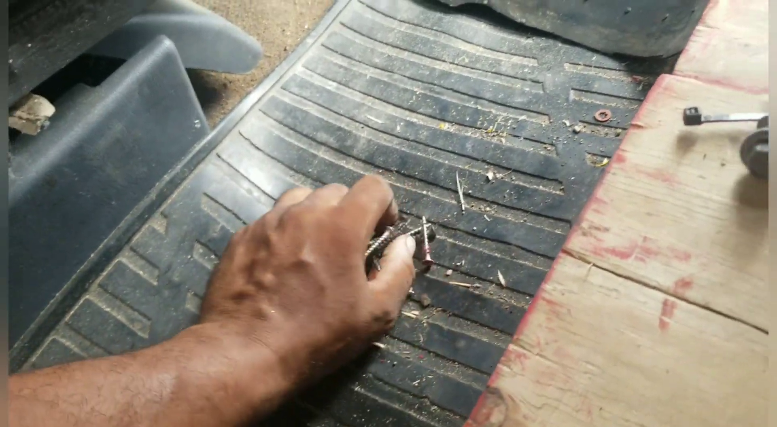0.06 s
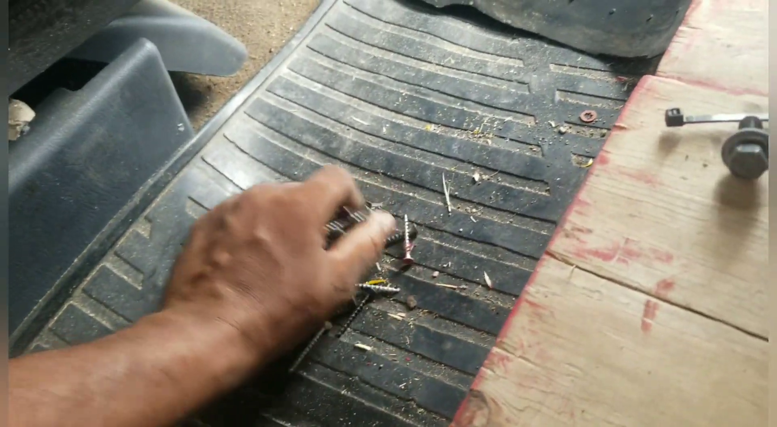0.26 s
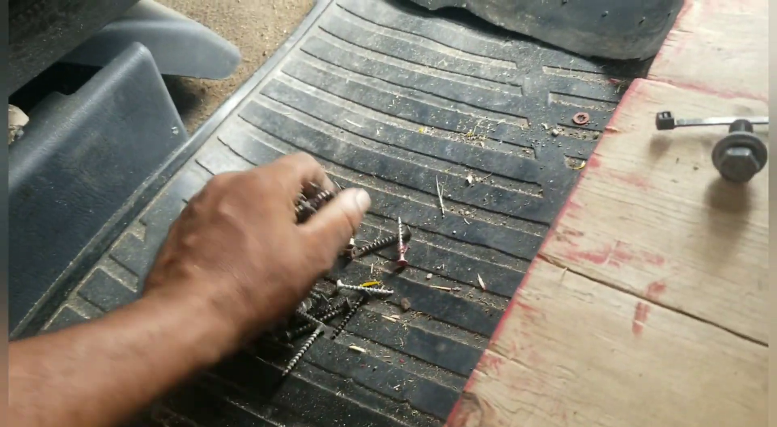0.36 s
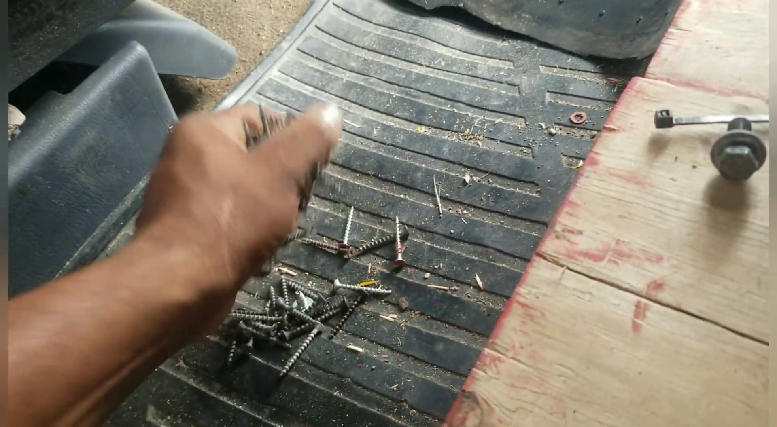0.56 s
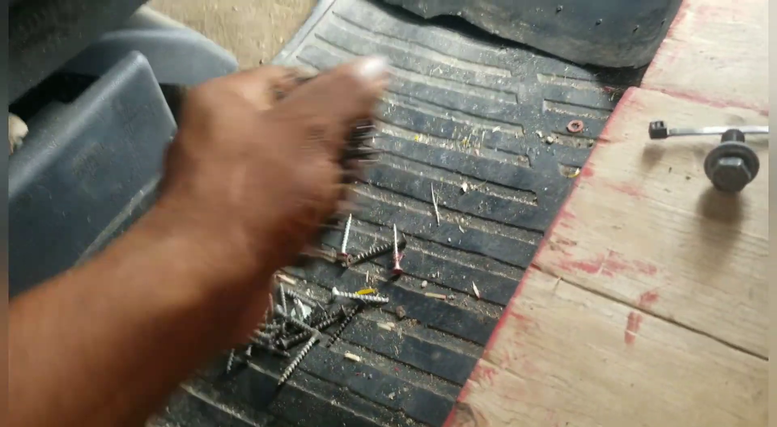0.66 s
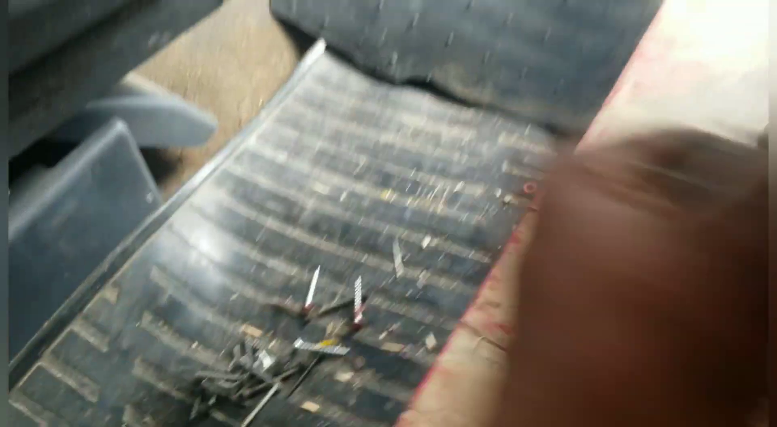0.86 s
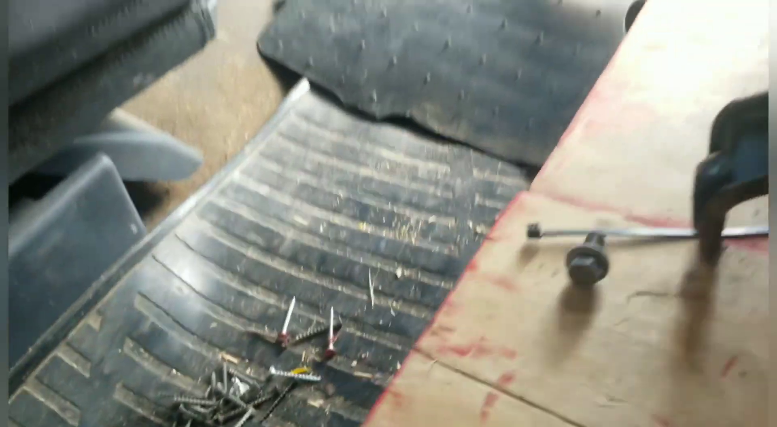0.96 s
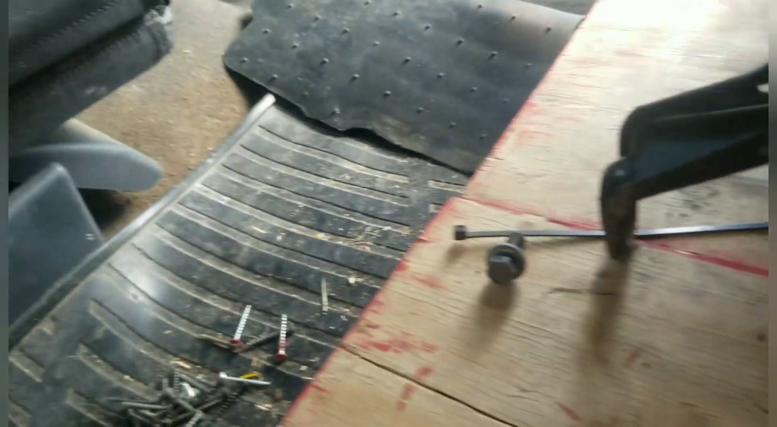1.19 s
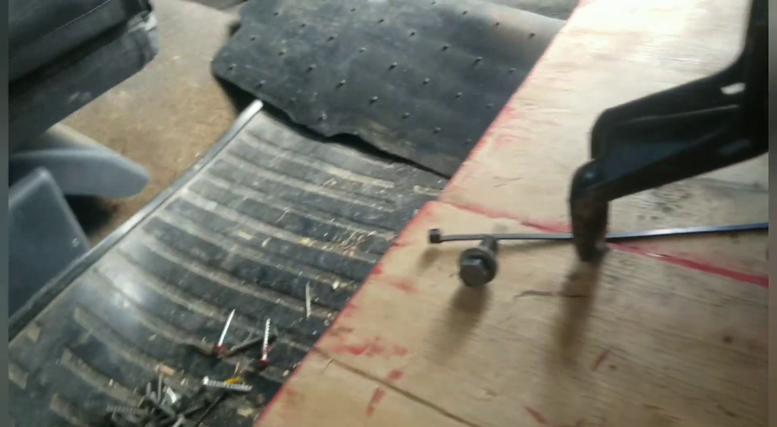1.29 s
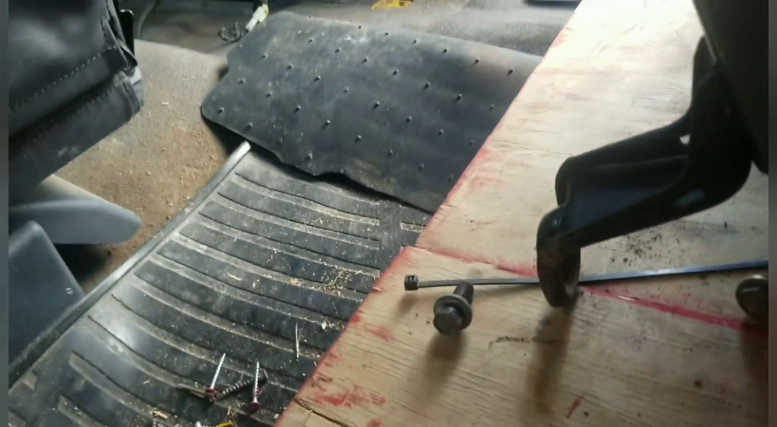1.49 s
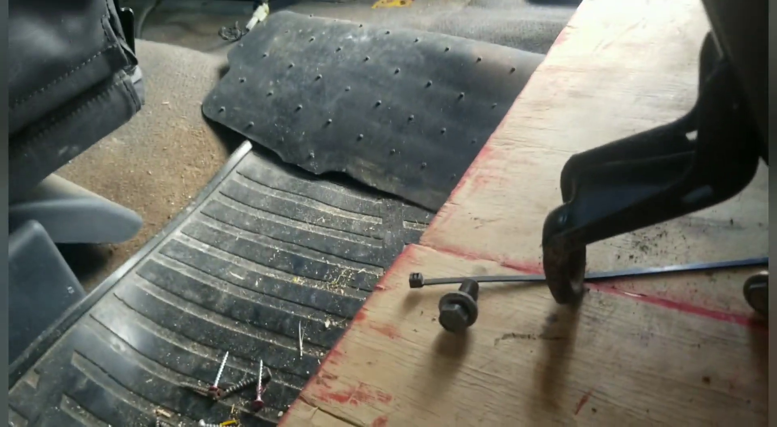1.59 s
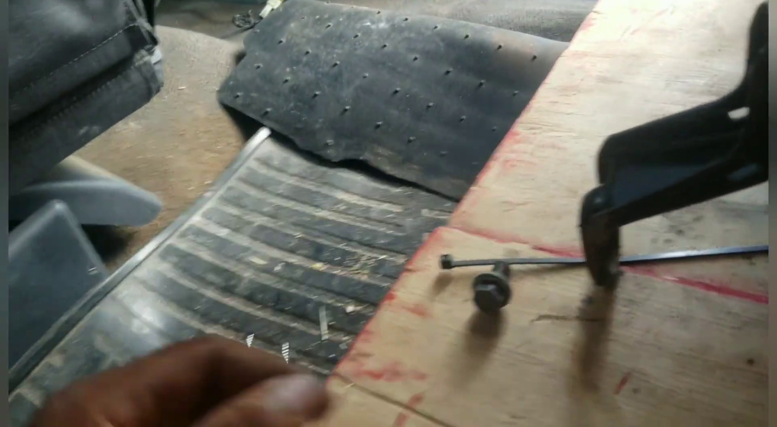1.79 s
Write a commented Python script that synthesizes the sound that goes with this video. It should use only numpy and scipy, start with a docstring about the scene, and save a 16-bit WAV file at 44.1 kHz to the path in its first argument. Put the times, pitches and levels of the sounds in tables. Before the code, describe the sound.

Loose metal screws clink as a hand gathers them, then metal clatters on a vehicle floor.

```python
"""Loose screws on a car floor

A hand rakes steel screws together on a rubber mat. A bunch clinks down brightly and bounces, setting
other screws and nearby sheet metal ringing. A second later a duller clatter thumps the floor.
The small cabin smears each hit into a short tail; soft rubbing and handling rumble lie underneath."""
import sys
import numpy as np
from scipy import signal
from scipy.fft import rfft, irfft, next_fast_len
from scipy.io import wavfile

SR = 44100
rng = np.random.default_rng(int(sys.argv[2]) if len(sys.argv) > 2 else 0)


def inscribe(sig):
    """Save sig as 16-bit PCM at rate SR to the path in sys.argv[1].

    A 1-D sig is mono; a 2-D sig holds one channel per row.
    Samples are clipped to [-1, 1] before scaling.
    """
    pcm = np.round(np.clip(np.atleast_2d(sig).T, -1, 1) * 32767)
    wavfile.write(sys.argv[1], SR, pcm.astype(np.int16))


N = 81585
RING_TIME = np.arange(int(.7 * SR)) / SR   # seconds since a hit

# A "colour" says how strong each pitch is in a noise. A "mode" is one tone a struck object rings at.
# "t60" is the time a sound takes to fade by 60 dB.

# how loud the hand's rubbing and the handling rumble are over time: t/s, level/dB
RUB_LEVEL = [(0, -52), (.22, -53), (.42, -52.5), (.55, -73), (.7, -65), (.8, -79.5), (1.26, -74),
             (1.58, -51), (1.72, -60.5), (1.85, -61)]
RUMBLE_LEVEL = [(0, -55.5), (.3, -58.5), (.5, -56.5), (.58, -47.5), (.66, -45.5), (.77, -55), (.87, -49),
                (.97, -47.5), (1.08, -59.5), (1.28, -60), (1.68, -53.5), (1.85, -63)]
# colours of the rubbing, the rumble and the quiet cabin: f/Hz, level/dB
RUB_COLOUR = [(150, -11), (300, -1), (480, -0.5), (700, -0.5), (1100, -7.5), (2000, -16.5), (5000, -40)]
RUMBLE_COLOUR = [(60, -20.5), (110, -16.5), (140, -2), (185, -0.5), (250, -11.5), (340, -17.5), (700, -40),
                 (1500, -57.5)]
CABIN_COLOUR = [(25, -10), (50, 4), (90, -5.5), (250, -18), (600, -23), (1200, -41), (3000, -40),
                (8000, -46), (15000, -41)]

# how hard the screws are stirred: t/s, level/dB
STIR_LEVEL = [(0, -61.5), (.23, -69.5), (.3, -60), (.55, -69), (.58, -59.5), (.65, -62), (.75, -72),
              (.88, -71.5), (.97, -82.5), (1.26, -84), (1.55, -64.5), (1.72, -93), (1.85, -82.5)]
# colour of the stirring ticks: f/Hz, level/dB
STIR_COLOUR = [(500, 8), (1200, -5), (2500, 0), (3800, -10), (5500, 9.5), (8000, -19.5), (15000, -13.5)]
# how long a tick takes to fade: f/Hz, t60/s
STIR_FADE = [(1000, 0.12), (10000, 0.11)]

# bright hits of screw on screw: t/s, level/dB
CLINKS = [(.001, -57), (0.059, -55), (0.074, -53), (0.147, -52), (0.171, -53.5), (0.216, -55.5),
          (0.2427, -29), (0.245, -20), (0.2555, -27.5), (.354, -37), (0.3574, -32.5), (0.3633, -35.5),
          (0.475, -48), (.632, -69)]
# colour of a clink: f/Hz, level/dB
CLINK_COLOUR = [(80, -25.5), (200, -25), (400, -3.5), (800, -1), (1400, -0.5), (2700, -2), (3400, -10.5),
                (3950, -3.5), (5800, 1), (7600, -12.5), (9500, -4.5), (11500, -0.5), (13800, 1.5),
                (15500, -0.5)]
# how long a clink takes to fade: f/Hz, t60/s
CLINK_FADE = [(400, 0.36), (1500, 0.16), (5000, 0.3), (13000, 0.21)]
# modes of the screws and of the nearby sheet metal: f/Hz, level/dB, t60/s
SCREW_MODES = [(746.4, -0.5, 0.18), (1038, 4, 0.049), (2448, -7, 0.22)]
SHEET_MODES = [(1001, 3.5, 0.8), (1034, -6, 0.69), (1130, -3.5, .3)]
# single screws ringing out, each at its own pitch: t/s, f/Hz, level/dB
PINGS = [(.245, 2750, -41), (.245, 3790, -35), (.245, 4850, -32), (.245, 6620, -40), (.245, 11560, -33),
         (.245, 13850, -38), (.2555, 3880, -39), (.2555, 10270, -39), (.2555, 11020, -36),
         (.2555, 12810, -38), (.2555, 15070, -41), (.357, 3960, -45), (.357, 4770, -43), (.357, 11150, -44),
         (.357, 12130, -42), (.357, 13710, -38)]

# duller knocks of metal on the floor: t/s, metal level/dB, bright edge level/dB, floor boom level/dB
KNOCKS = [(.029, -54, -70, -47), (1.2985, -41, -72, -48), (1.32, -37, -62, -45), (1.333, -36, -44, -38),
          (1.3383, -22, -35, -40), (1.341, -27, -33, -48), (1.348, -27, -36, -33), (1.357, -26, -32, -26),
          (1.376, -32, -35, -52), (1.383, -27, -41, -42), (1.4135, -45, -39, -42), (1.429, -37, -46, -51),
          (1.461, -31, -40, -28), (1.468, -33, -48, -29), (1.478, -38, -53, -35), (1.526, -42.5, -55, -40),
          (1.598, -51, -75, -46), (1.615, -45, -63, -65), (1.625, -48, -78, -65), (1.69, -55.5, -69, -63.5),
          (1.73, -59, -85, -65)]
# colours of those three parts of a knock: f/Hz, level/dB
KNOCK_COLOUR = [(100, -25), (300, -13.5), (700, -16.5), (1000, 1), (1500, 1), (2300, 6), (3600, 1.5),
                (5000, -9), (6200, -13.5), (8000, -29.5), (15500, -50)]
EDGE_COLOUR = [(1500, -30.5), (5000, 19.5), (6500, 4.5), (8500, -24.5), (10000, 2), (13000, 0), (15500, 8)]
BOOM_COLOUR = [(60, -21), (120, -15), (200, 8), (270, -13), (350, 4.5), (560, 0.5), (750, -6.5),
               (1400, -31)]
# how long a knock and its boom take to fade: f/Hz, t60/s
KNOCK_FADE = [(500, 0.19), (2500, 0.15), (6000, 0.15), (13000, 0.37)]
BOOM_FADE = [(100, 0.093), (600, 0.2)]
# modes of the knocking metal and of the booming floor: f/Hz, level/dB, t60/s
KNOCK_MODES = [(917, 7.5, 0.1), (1328, 0.5, 0.12), (2200, 4.5, 0.16), (2340, -4, 0.2), (2370, -2.5, 0.071),
               (3500, -16, 0.13)]
BOOM_MODES = [(248, 0.5, 0.042), (324, -5.5, 0.12), (350.7, 1, .17), (380, 1, 0.14), (509.5, -0.5, .17),
              (565.3, -2, 0.17)]
# deep thuds of the floor panel: t/s, level/dB, f/Hz
THUDS = [(0.129, -40, 162), (0.242, -28.5, 147.9), (0.36, -37, 150.7), (1.344, -37.5, 104.7),
         (1.463, -30, 182.2), (1.48, -28, 174), (1.521, -30.5, 186.8), (1.686, -45.5, 158)]

# a faint squeak and thin high tones: middle t/s, half length/s, f/Hz, width/Hz, level/dB
SQUEAKS = [(0.864, 0.063, 1516, 70, -78), (1.393, .01, 9400, 250, -43), (1.395, 0.045, 15550, 350, -43),
           (1.402, .009, 15680, 200, -34)]

# how alike the two microphones sound: f/Hz, likeness (near 1 the same, 0 unrelated, below 0 opposed)
LIKENESS = [(50, 0.96), (180, 0.8), (300, 1.9), (450, 0.65), (1000, 0.61), (2200, 0), (5000, 0.21),
            (12000, -0.5)]
# how much louder the left microphone is than the right: f/Hz, level/dB
BALANCE = [(30, -10), (70, 1.5), (180, 1), (480, 6.5), (1000, 4.5), (4000, 3), (12000, 3.5)]


def from_db(db):
    """Turn decibels into a number to multiply by."""
    return 10 ** (np.asarray(db) / 20)


def unit_power(sound):
    """Scale a sound so that its average power is 1."""
    return sound / np.sqrt(np.mean(sound ** 2) + 1e-20)


def at_hz(table, hz):
    """Look up a pitch in a table, blending between rows on a musical (log) scale."""
    pitches, values = np.transpose(table)
    return np.interp(np.log(hz), np.log(pitches), values)


def loudness(table):
    """Turn a table of levels over time into a gain for every sample."""
    return from_db(np.interp(np.arange(N) / SR, *np.transpose(table)))


def add(track, s, sound):
    """Mix a sound into the track, starting at s seconds."""
    start = int(s * SR)
    track[..., start:start + sound.shape[-1]] += sound[..., :N - start]


def noise_bands(colour, size):
    """Stereo noise of total power 1 in third-octave bands; gives their centre pitches and the bands."""
    edges = 22 * 2 ** (np.arange(30) / 3)
    centres = np.sqrt(edges[1:] * edges[:-1])
    white = rng.standard_normal((2, 2, size + SR // 4))   # extra length lets the filters settle
    gains = from_db(at_hz(colour, centres)) * np.sqrt(centres)   # higher bands are wider
    bands = []
    for k, gain in enumerate(gains / np.linalg.norm(gains)):
        band_pass = signal.butter(2, edges[k:k + 2], "band", fs=SR, output="sos")
        shared, opposed = signal.sosfilt(band_pass, white[k % 2])[:, -size:]
        alike = np.clip(at_hz(LIKENESS, centres[k]), -.99, .99)
        stereo = np.sqrt(1 + alike) * shared + np.sqrt(1 - alike) * opposed * [[1], [-1]]
        bands.append(gain * unit_power(stereo))
    return centres, np.array(bands)


def noisy_ring(colour, fade_table, crack_db, crack_s=.003, build_s=.004):
    """One hit in the cabin: a short crack, then crowded echoes that build up and fade band by band."""
    t = RING_TIME[:len(RING_TIME) // 2]
    attack = 1 - np.exp(-t / build_s) + from_db(crack_db) * np.exp(-t / crack_s)
    ring = 0
    for hz, noise in zip(*noise_bands(colour, size=len(t))):
        shape = attack * from_db(-60 * t / at_hz(fade_table, hz))
        strength = np.sqrt(np.mean(noise ** 2) * np.mean(shape ** 2))
        ring = ring + strength * unit_power(noise * shape)
    return np.pad(ring, [(0, 0), (0, len(RING_TIME) - len(t))])


def clear_ring(modes):
    """Pure fading tones that start at power 1 in total; high ones reach the microphones out of step."""
    ring = 0
    for hz, db, t60 in modes:
        phase = rng.uniform(-np.pi, np.pi, (2, 1)) * (1 - at_hz(LIKENESS, hz))
        ring = ring + from_db(db - 60 * RING_TIME / t60) * np.sin(2 * np.pi * hz * RING_TIME + phase)
    start_power = sum(from_db(db) ** 2 for _, db, _ in modes) / 2
    return ring / np.sqrt(start_power)


def hit_clicks(times, dbs, bounces=4, mean_gap_s=.006, bounce_db=-16.5):
    """One click for each hit, followed by a few small bounces at random gaps."""
    clicks = np.zeros(N + SR)
    for s, db in zip(times, dbs):
        clicks[int(s * SR)] += from_db(db)
        later = s + np.cumsum(rng.exponential(mean_gap_s, bounces))
        clicks[(later * SR).astype(int)] += from_db(db + bounce_db) * rng.choice([-1, 1], bounces)
    return clicks[:N]


def ring_at(clicks, ring):
    """Start a copy of a stereo ring at every click."""
    return signal.fftconvolve(clicks[None], ring, axes=1)[:, :N]


def strike(times, dbs, colour, fade_table, modes, crack_db, modes_db, spots=2):
    """Hits land on different spots in turn: all share the same modes, each has its own noisy ring."""
    tones = from_db(modes_db) * clear_ring(modes)
    track = 0
    for k in range(spots):
        clicks = hit_clicks(times[k::spots], dbs[k::spots])
        track = track + ring_at(clicks, noisy_ring(colour, fade_table, crack_db) + tones)
    return track


def background(cabin_db=-56):
    """Three soft noises: skin rubbing on rubber, handling rumble and the steady hush of the cabin."""
    layers = [(loudness(RUB_LEVEL), RUB_COLOUR),
              (loudness(RUMBLE_LEVEL), RUMBLE_COLOUR),
              (from_db(cabin_db), CABIN_COLOUR)]
    return sum(gain * noise_bands(colour, size=N)[1].sum(0) for gain, colour in layers)


def stirring(ticks_per_s=240, spread_db=2.5):
    """Screws shift against each other with tiny random ticks."""
    tick_db = spread_db * np.minimum(rng.exponential(1, N), 4)
    sizes = from_db(tick_db) * rng.choice([-1, 1], N)
    ticks = sizes * (rng.random(N) < ticks_per_s / SR)
    rattle = ring_at(ticks, noisy_ring(STIR_COLOUR, STIR_FADE, crack_db=-1))
    return loudness(STIR_LEVEL) * unit_power(rattle)


def clinks():
    """Screws land on each other with a bright crash."""
    times, dbs = np.transpose(CLINKS)
    return strike(times, dbs, CLINK_COLOUR, CLINK_FADE, SCREW_MODES, crack_db=-1, modes_db=-9)


def jingle(tones=10, range_hz=(2400, 15000), relative_db=-7, spread_db=4, t60_s=.11, ping_t60_s=.2):
    """Each clink sets other screws ringing at random pitches; a few set pitches stand out as pings."""
    track = np.zeros((2, N))
    for s, db in CLINKS:
        pitches = rng.uniform(*range_hz, tones)
        tone_dbs = spread_db * rng.standard_normal(tones)
        modes = [(hz, tone_db, t60_s) for hz, tone_db in zip(pitches, tone_dbs)]
        add(track, s, from_db(db + relative_db) * clear_ring(modes))
    for s, hz, db in PINGS:
        add(track, s, from_db(db) * clear_ring([(hz, 0, ping_t60_s)]))
    return track


def sheet_metal(relative_db=-19.5):
    """Nearby sheet metal sings on after each clink; its tones lie so close together that they waver."""
    clicks = hit_clicks(*np.transpose(CLINKS), bounces=0)
    return from_db(relative_db) * ring_at(clicks, clear_ring(SHEET_MODES))


def clatter():
    """Metal tumbles on the floor; hard hits have a bright edge, heavy ones make the floor boom."""
    times, metal_db, edge_db, boom_db = np.transpose(KNOCKS)
    metal = strike(times, metal_db, KNOCK_COLOUR, KNOCK_FADE, KNOCK_MODES, crack_db=4, modes_db=-9)
    edge = ring_at(hit_clicks(times, edge_db), noisy_ring(EDGE_COLOUR, KNOCK_FADE, crack_db=6))
    boom = strike(times, boom_db, BOOM_COLOUR, BOOM_FADE, BOOM_MODES, crack_db=-2, modes_db=-3.5)
    return metal + edge + boom


def thuds(rise_s=.0044, t60_s=.19):
    """The floor panel swings at a low pitch under the cushioning mat."""
    track = np.zeros(N)
    shape = np.sqrt(2) * (1 - np.exp(-RING_TIME / rise_s)) * from_db(-60 * RING_TIME / t60_s)
    for s, db, hz in THUDS:
        add(track, s, from_db(db) * shape * np.sin(2 * np.pi * hz * RING_TIME))
    return track


def squeaks():
    """Each squeak is noise in a band so narrow that it has a pitch; it swells, holds and fades."""
    t = np.arange(N) / SR
    track = 0
    for middle_s, half_s, hz, width_hz, db in SQUEAKS:
        band_pass = signal.butter(2, [hz - width_hz / 2, hz + width_hz / 2], "band", fs=SR, output="sos")
        whistle = unit_power(signal.sosfilt(band_pass, rng.standard_normal((2, N))))
        swell = np.exp(-((t - middle_s) / half_s) ** 4)
        track = track + from_db(db) * swell * whistle
    return track


def scene(bass_cut_hz=137):
    """Mix all the sounds. The hits lose their deepest bass, since the struck floor gives little of it."""
    bass_cut = signal.butter(2, bass_cut_hz, "high", fs=SR, output="sos")
    hits = signal.sosfilt(bass_cut, clinks() + jingle() + clatter() + thuds())
    return hits + sheet_metal() + stirring() + squeaks() + background()


def record(dry, right_delay_s=.000317, treble_cut_hz=15800):
    """The left microphone hears things earlier and, above the deep bass, louder; top treble is cut."""
    size = next_fast_len(N + SR // 2)
    hz = np.maximum(np.arange(size // 2 + 1) * SR / size, 1)
    left = from_db(at_hz(BALANCE, hz) / 2)
    right = np.exp(-2j * np.pi * hz * right_delay_s) / left
    heard = irfft(rfft(dry, size) * np.array([left, right]), size)[:, :N]
    treble_cut = signal.ellip(12, .1, 80, treble_cut_hz, fs=SR, output="sos")
    return signal.sosfilt(treble_cut, heard)


dry = scene()
out = record(dry)
inscribe(out)
```